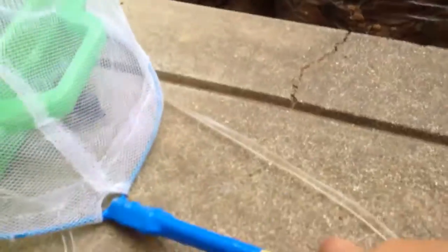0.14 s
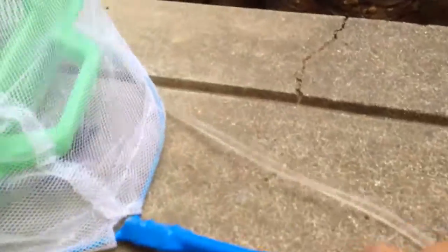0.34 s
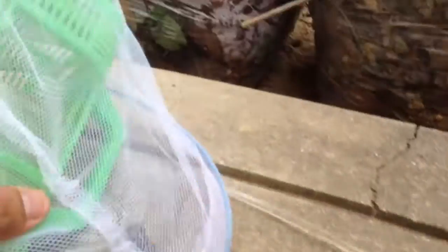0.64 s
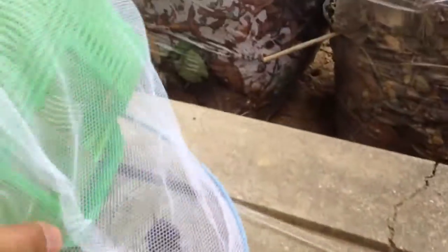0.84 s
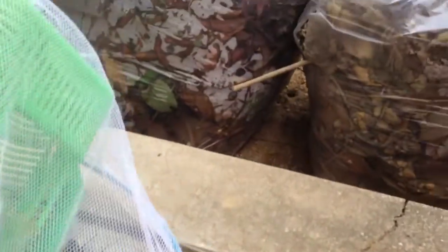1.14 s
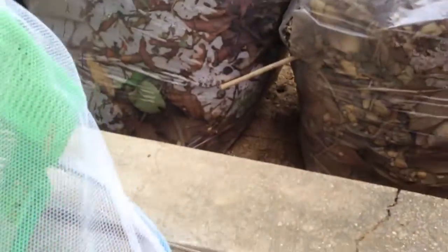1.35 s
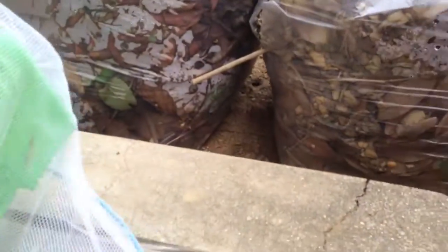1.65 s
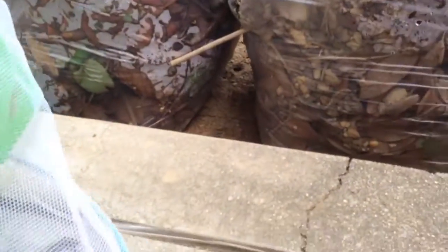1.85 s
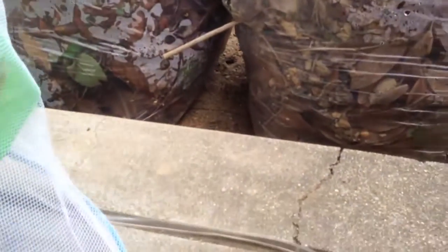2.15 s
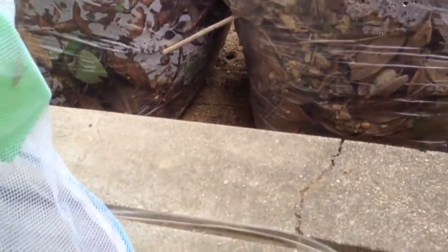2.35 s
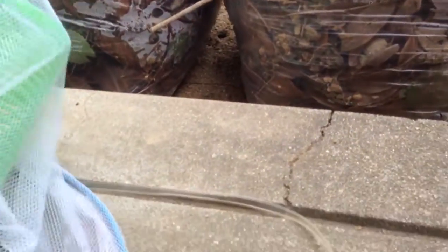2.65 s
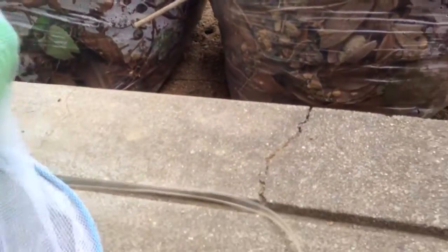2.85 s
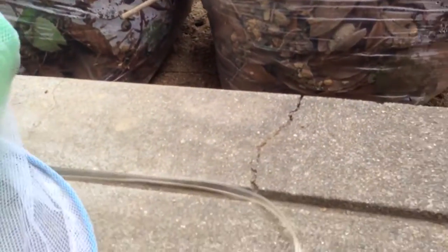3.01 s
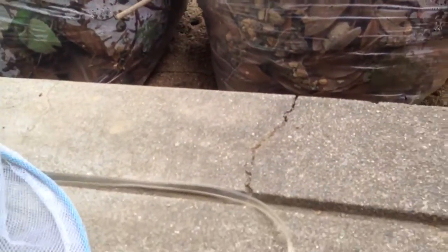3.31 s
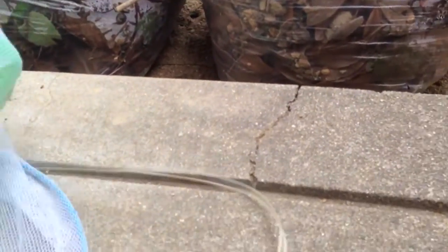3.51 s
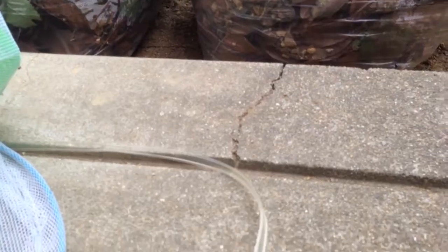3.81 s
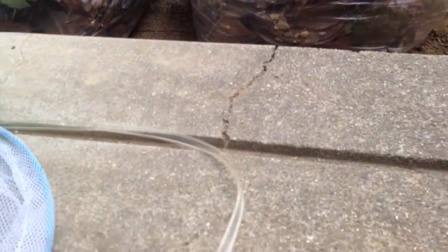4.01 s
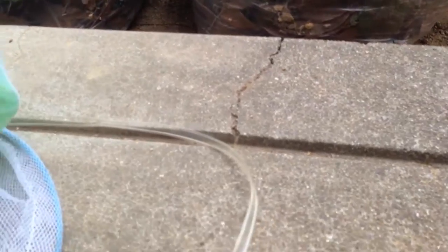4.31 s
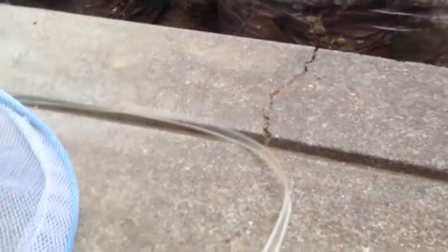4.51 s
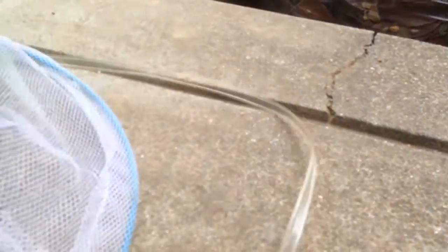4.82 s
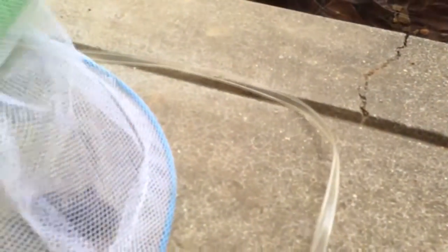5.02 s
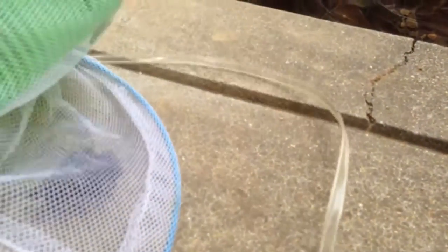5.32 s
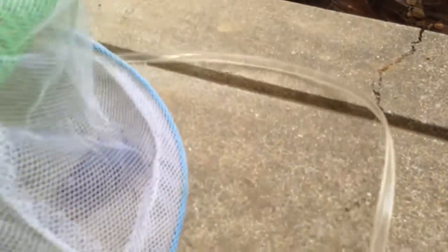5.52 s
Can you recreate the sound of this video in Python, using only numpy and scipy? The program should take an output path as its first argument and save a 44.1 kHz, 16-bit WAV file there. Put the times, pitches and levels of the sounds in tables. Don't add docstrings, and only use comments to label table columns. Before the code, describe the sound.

Rapid, irregular papery flutters and sharp snaps of insect wings against mesh and a plastic cage, with a near-quiet gap before a renewed burst.

```python
import sys
import numpy as np
from scipy import signal
from scipy.io import wavfile
from scipy.ndimage import uniform_filter1d

SR = 44100
rng = np.random.default_rng(int(sys.argv[2]) if len(sys.argv) > 2 else 0)


def volts_from_decibels(level):
    exponent = np.asarray(level, float) / 20
    return 10 ** exponent


def persist_wave(psi):
    counts = np.round(np.clip(psi, -1, 1) * 32767).astype(np.int16)
    wavfile.write(sys.argv[1], SR, np.atleast_2d(counts).T)


N = 249606
SLAP_DELAY_S = 0.00099
TAIL_BEND, SWEEP_BEND = 1.074, 1.01


def rms_one(x):
    return x / np.sqrt(np.mean(x ** 2) + 1e-20)


def at_hz(points, hz):
    point_hz, point_db = np.transpose(points)
    return np.interp(np.log(hz), np.log(point_hz), point_db)


def drift(rate_hz):
    pole = np.exp(-32 * np.pi * rate_hz / SR)
    noise = rng.standard_normal(N // 16 + 2002)
    slow = signal.lfilter([1], [1, -2 * pole, pole * pole], noise)[2000:]
    return np.interp(np.arange(N) / 16, np.arange(len(slow)), rms_one(slow))


def ring(clicks, hz, t60):
    radius, angle = volts_from_decibels(-60 / (t60 * SR)), 2 * np.pi * hz / SR
    return signal.lfilter([0, np.sin(angle)], [1, -2 * radius * np.cos(angle), radius * radius], clicks + 1e-18)


def high_pass(x, hz):
    return signal.sosfilt(signal.butter(2, hz, "high", fs=SR, output="sos"), x)


def bands(low_hz, count, size=2):
    edges = low_hz * 2 ** (np.arange(count + 1) / size)
    return [(np.sqrt(a * b), signal.butter(2, [a, b], "band", fs=SR, output="sos"))
            for a, b in zip(edges, edges[1:])]


def contacts():
    # (time [s], power [dB], fall [ms], brightness [dB])
    mesh_slaps = [(0.3496, -20, 0.85, 14), (0.5943, -44, 1.0, 8), (0.7005, -15.5, 1.8, 5.5),
                  (0.879, -20, 5.7, 14), (0.9412, -15, 3.6, 10), (0.9809, -19.5, 5.1, 11),
                  (1.067, -31, 3.4, 26), (1.2216, -13, 1.8, 5), (1.252, -23, 2.4, 3),
                  (1.2906, -8, 0.71, 8.5), (1.4432, -17.5, 2.6, 9), (1.522, -19.5, 4.2, 17),
                  (2.3263, -25.5, 6.4, -4), (2.4046, -19, 3.1, 4), (2.505, -21, 0.73, 10),
                  (2.6795, -17, 3.6, 12.5), (2.831, -11.5, 1.1, 11), (2.8845, -29, 6.5, -5),
                  (3.0304, -24, 5.7, 9), (3.3046, -15.5, 1.3, 9), (3.3791, -23.5, 4.3, -3),
                  (3.4115, -20.5, 9.4, 2), (3.6055, -12.5, 2.5, 4), (3.612, -16, 0.84, 4),
                  (3.6385, -14.5, 1.2, 4), (3.654, -31, 9.5, 4), (3.667, -26.5, 0.76, 4),
                  (3.689, -47, 0.8, 2), (4.7973, -14, 0.52, 13), (4.9021, -18, 1.1, 4),
                  (5.014, -18, 2.2, 16), (5.0325, -20, 2.3, 4), (5.091, -41, 4.5, 17),
                  (5.0998, -19.5, 2, 9), (5.1852, -15.5, 0.89, 2), (5.212, -31, 1.4, 12),
                  (5.294, -25, 1.9, 7), (4.6042, -20, 3.3, 5), (4.921, -24, 0.34, 31),
                  (4.9755, -17, 2.4, 17.5), (5.1073, -26, 5, 9), (5.359, -34, 3.5, 25),
                  (5.406, -15, 1.6, 16)]
    # (time [s], power [dB], fall [ms], brightness [dB])
    draped_slaps = [(0.0249, -16, 5, 0), (0.0521, -14.5, 1.8, -9), (0.058, -26.5, 22, 4),
                    (0.5595, -34.5, 1.9, 21), (1.0737, -17, 3.7, 4), (1.4158, -17.5, 4.3, 7),
                    (1.5546, -26.5, 17, 5), (1.6003, -15.5, 1.3, 13), (1.941, -14.5, 1.1, 6),
                    (2.1838, -25, 1, -6), (2.1982, -7, 0.92, 7.5), (2.2485, -21.5, 3.1, 1),
                    (2.2594, -19.5, 3.2, 9), (2.2945, -33, 2.5, 4), (2.3076, -19.5, 2.7, 3),
                    (2.3778, -16, 7.3, 6.5), (2.5983, -8.5, 2, -2), (2.7045, -9, 1.4, 1),
                    (2.9998, -20, 1.5, 15), (3.129, -34, 4.6, 3), (3.172, -14, 3.1, 3.5),
                    (3.2662, -15, 2.3, 7), (3.3094, -17, 2.7, 3), (3.6006, -17, 3.6, 4),
                    (4.6702, -15, 2.6, 5), (5.0378, -9.5, 1, 10), (5.0727, -16, 0.95, 14),
                    (5.1857, -20.5, 3.4, 6), (5.3012, -24, 5.4, 2)]
    # (time [s], power [dB], fall [ms], brightness [dB])
    cage_slaps = [(0.0879, -31, 19, -8), (0.1047, -14.5, 4.8, 5.5), (0.3325, -22, 10.8, -1),
                  (0.639, -6, 1.3, -11.5), (0.6827, -33.5, 28, -1), (0.7068, -22, 6.8, 6),
                  (0.7447, -25, 7.2, 5), (0.8325, -20, 6.7, -1), (0.846, -14, 1.6, 16),
                  (0.9086, -24.5, 6, 17), (2.0872, -17.5, 0.9, -3), (2.544, -32, 49, -8),
                  (2.729, -28.5, 14, -12), (2.871, -18.5, 2.9, -0.5), (2.9764, -22.5, 3.6, 2.5),
                  (3.0926, -27, 8.3, 6), (3.148, -19, 2.6, -3), (3.452, -32, 0.67, -7),
                  (4.7983, -19.5, 6.7, -6), (4.8737, -12.5, 3.9, 0.5), (4.95, -31, 290, 6.5),
                  (5.0055, -10.5, 1.6, 9), (5.2622, -16.5, 2.3, 5), (5.2765, -17, 0.49, -35),
                  (5.4986, -29.5, 6.2, 13)]
    # (time [s], power [dB], fall [ms], brightness [dB])
    plucks = [(0.0394, -25, 1.8, 18), (0.0533, -13.5, 1.24, 12), (0.0606, -21, 1.2, 18),
              (0.159, -20, 1.4, 3), (0.2494, -35, 7.9, 12), (0.2783, -33, 0.51, 21), (0.3236, -31, 0.5, 17),
              (0.3416, -21.5, 0.44, 19), (0.8168, -23.5, 1.9, 19), (0.8652, -27, 3, 12),
              (0.9578, -15.5, 1.1, 16), (0.9809, -22, 1.7, 6), (1.0049, -32, 2.2, 20),
              (1.0553, -31, 0.8, 20), (1.2729, -34, 4.5, 17), (1.2808, -21, 1.4, 6), (1.3595, -27, 2.6, 12),
              (1.3979, -29, 0.92, 7), (1.4518, -14.5, 1, 12), (1.4828, -15.5, 3, 14),
              (1.5307, -18, 0.63, 20), (1.5601, -20, 0.6, 5), (1.5806, -30, 1.6, 15),
              (1.5982, -14.5, 0.94, 5), (1.6063, -18, 1.1, 10), (1.6791, -25, 0.45, 23),
              (1.8315, -27, 2.5, 5), (1.8519, -36, 1.6, 20), (1.9927, -32, 1.9, -1),
              (2.0405, -30, 0.88, 23), (2.0352, -25, 1.7, 10), (2.1636, -37, 0.77, 15),
              (2.2152, -27.5, 5.5, 6), (2.3553, -25, 0.7, 7), (2.4046, -11.5, 0.48, 12),
              (2.4524, -40, 2.5, 14), (2.8215, -44, 4.5, 3), (3.0705, -20.5, 0.64, 13),
              (3.0941, -26, 1.2, 2), (3.2077, -27.4, 0.8, 8), (3.2473, -23, 4.3, 5), (3.2598, -15, 1.5, 2),
              (3.3788, -14.5, 1.7, 13), (3.4513, -18, 1.1, -7), (3.5472, -33, 3.4, 4),
              (3.5775, -44, 0.5, 13)]
    # (time [s], power [dB], fall [ms], brightness [dB])
    ticks = [(0.1661, -21, 4.8, 0), (0.4662, -33, 2, -9), (0.4815, -38, 0.6, -10), (0.5344, -35, 0.5, 0),
             (0.6828, -19, 0.59, -10), (1.2313, -20, 0.84, 3), (1.6967, -12.5, 0.43, 0),
             (1.8983, -27.5, 4.5, 9), (2.0895, -15, 0.73, 0), (2.1832, -18.5, 1.3, 1),
             (2.5358, -23, 1.2, 5), (2.5469, -18.5, 2.8, -11), (2.5755, -20, 4.9, 3), (2.5854, -23, 4.9, 3),
             (2.6459, -19.5, 2.1, 6), (2.7289, -24, 1, -6), (2.8543, -34, 1.1, -4), (2.9007, -28, 1.2, 2),
             (2.9299, -45, 2.2, -1), (3.1302, -14.5, 3.7, 4.5), (3.4284, -15, 0.63, 4),
             (3.5248, -22.5, 3.8, 2), (4.0049, -30, 2.9, -6), (4.0203, -40, 1.6, -13),
             (4.2277, -47.4, 4.5, -2), (4.6868, -22, 0.52, -29), (5.158, -25.5, 4.4, -5),
             (5.4507, -26, 0.77, -5)]
    # (time [s], power [dB], length [ms], brightness [dB])
    brushes = [(0.535, -30, 5.7, 3), (1.007, -26, 9.9, 12), (1.142, -17.5, 3.9, 10), (1.39, -15, 4.7, -3.5),
               (1.498, -20.5, 10, -1), (1.627, -18.5, 3.5, 4.5), (1.823, -19, 11.8, 3.5),
               (2.062, -35, 3.2, 25), (2.35, -26, 21, 5), (2.79, -22.5, 3.8, 6), (4.599, -17, 1.8, -4),
               (4.76, -18, 5.2, 0.5), (4.814, -17.5, 8.5, 5.5), (5.124, -22, 10.4, 6)]
    # (time [s], power [dB], length [ms], brightness [dB])
    snags = [(0.04, -28.5, 16, -4), (0.143, -24, 4.6, 3), (0.198, -27, 6.8, 7), (0.279, -40.5, 18, 2),
             (0.925, -21, 7.9, 7), (1.123, -15.5, 9.7, 8), (1.182, -19, 5.3, 10), (1.716, -23.5, 9.4, 13.5),
             (1.903, -31.5, 8.2, -10), (1.997, -25, 6.6, 6), (2.0272, -16.5, 1.9, 18),
             (2.04, -30.5, 9.8, -6), (3.024, -30, 5.1, 13), (3.22, -16.5, 4.5, 6), (3.481, -17, 6.6, 8),
             (3.99, -39.5, 27, -7), (4.138, -45.5, 26, -8), (4.167, -34, 4, 0), (4.238, -42, 2.2, -7),
             (4.284, -45.5, 69, -6), (4.714, -9, 5.1, -4), (5.162, -30, 5.4, 16), (5.227, -22.5, 3.8, 12),
             (5.258, -23, 9.7, -16), (5.3285, -15, 3.7, 16)]
    # (time [s], power [dB], length [ms], brightness [dB])
    drags = [(0.173, -21.5, 7.7, -1), (0.493, -38, 19, -5), (0.782, -23, 12.5, 5), (0.819, -24.5, 14, -10),
             (0.991, -15, 4.4, 4), (1.329, -31.5, 25, -21), (1.373, -22, 6.2, 8),
             (1.703, -21.5, 8.6, -14.5), (1.74, -21, 6.7, 10.5), (1.78, -15.5, 4.7, 10),
             (1.882, -9, 3.4, 4.5), (1.955, -32, 12, 3), (2.114, -17, 5.8, 7), (2.463, -28, 3.4, 11),
             (2.647, -28, 2.5, -14), (2.719, -22, 18, 2), (2.753, -16.5, 2.7, 10), (3.371, -20, 4.2, -5),
             (3.519, -30, 18.5, 5), (3.633, -24.5, 6.4, -4), (4.463, -53.5, 94, -14), (4.635, -18, 8.8, 3),
             (4.904, -24, 13.6, 3), (5.377, -25.5, 4.6, 0), (5.397, -25.5, 11, 0),
             (5.436, -30.5, 17.5, 7.5), (5.484, -22, 2.6, -6)]
    mesh_db, draped_db, cage_db, snag_db, drag_db = -31, -21, -16, -17.5, -19.5
    slap_rise_ms, pick_rise = 0.35, 0.17

    rows = []
    for table, place_db in [(mesh_slaps, mesh_db), (draped_slaps, draped_db), (cage_slaps, cage_db)]:
        for s, db, ms, bright in table:
            rows.append((s + SLAP_DELAY_S, db, slap_rise_ms, ms, bright, place_db, TAIL_BEND))
    for table, place_db in [(plucks, mesh_db), (ticks, drag_db)]:
        for s, db, ms, bright in table:
            rows.append((s, db, pick_rise * ms, ms, bright, place_db, TAIL_BEND))
    for table, rise, place_db in [(brushes, 0.31, mesh_db), (snags, 0.65, snag_db), (drags, 0.36, drag_db)]:
        for s, db, ms, bright in table:
            rows.append((s, db, rise * ms, (1 - rise) * ms, bright, place_db, SWEEP_BEND))
    return [(s, db, rise, fall, bright, place_db - 0.063 * (db + 43.0) - 0.37 * bright, bend)
            for s, db, rise, fall, bright, place_db, bend in rows]


def effort():
    # (time [s], power [dB], brightness [dB])
    rustle = [(0.0, -45, 5), (0.44, -48, -9), (1.5, -42, -3.5), (2.2, -51, -8), (3.41, -44, -6),
              (3.74, -57.5, -3), (3.85, -67, 7), (4.07, -53, -5.5), (4.25, -63, -9), (4.45, -50, 2),
              (4.84, -59, -30), (5.39, -58, -7), (5.5, -41.5, -7), (5.66, -48, -10)]
    # (time [s], power [dB], swell and fade [ms], brightness [dB])
    bag_rubs = [(0.22, -37.5, 21, 1), (0.66, -33, 37, -3.5), (0.88, -24, 19.6, 2.5),
                (1.32, -32.5, 12.4, 14), (1.87, -38, 15, 20), (2.53, -30.5, 55, 2), (2.64, -27, 49, 2),
                (2.84, -30.5, 8.1, -7), (3.299, -31, 59, 1), (3.958, -40, 6.6, -13), (4.73, -37.5, 14, -6),
                (5.06, -43, 140, -2.5), (5.28, -31.5, 24, -5)]
    rub_plastic_db = -21.5

    t = np.arange(N) / SR
    s, rustle_db, bright_db = np.transpose(rustle)
    rustle_db, bright_db = np.interp(t, s, rustle_db), np.interp(t, s, bright_db)
    tilt_db = np.array([np.full(N, -3.5), -bright_db / 2, bright_db / 2])
    power = volts_from_decibels(rustle_db + tilt_db) ** 2

    rubs = [(s, db, ms, ms, bright, rub_plastic_db, TAIL_BEND) for s, db, ms, bright in bag_rubs]
    for s, db, rise, fall, bright, plastic_db, bend in contacts() + rubs:
        near = slice(max(round((s - 0.3) * SR), 0), round((s + 0.3) * SR))
        ms = (t[near] - s) * 1000
        scale_ms = np.where(ms < 0, max(rise, 0.1), max(fall, 0.2))
        swell = np.exp(-(np.abs(ms) / scale_ms) ** bend)
        part_db = np.array([[plastic_db + 15], [-bright / 2 + 0.5], [bright / 2 - 1.5]])
        power[:, near] += volts_from_decibels(db + part_db) ** 2 * swell
    return 10 * np.log10(power)


def shaking():
    # (time [s], rumble level [dB])
    jolts = [(0.0, -63.5), (0.22, -59), (0.35, -69), (0.66, -56.5), (0.88, -54.5), (1.32, -61), (1.43, -57),
             (2.29, -54.5), (2.64, -63), (3.19, -62.5), (4.29, -53.5), (4.62, -59.5), (4.96, -60),
             (5.15, -61), (5.277, -64), (5.58, -64)]
    rise_db_per_s, fade_db_per_s, still_db = 168, 113, -68
    t = np.arange(N) / SR
    power = volts_from_decibels(still_db) ** 2
    for s, db in jolts:
        slope = np.where(t < s, rise_db_per_s, fade_db_per_s)
        power = power + volts_from_decibels(db - slope * np.abs(t - s)) ** 2
    return 10 * np.log10(power)


def air(effort_db):
    # (frequency [Hz], level [dB per Hz])
    hush = [(30, -45), (65, -10.5), (120, -13.5), (190, -6), (450, -11.5), (1000, -14), (14800, -31.5)]
    fan_follows = 0.45
    white, out = rng.standard_normal((2, N)), 0
    lumps_db = 3 * drift(28)
    fan_db = fan_follows * (uniform_filter1d(effort_db, size=500) + 40)
    shake_db = shaking() + 74 + fan_db
    for k, (hz, sos) in enumerate(bands(28.7, count=18)):
        low_share = np.clip(1.3 - hz / 400, 0, 1)
        puff_db = (shake_db + lumps_db + 4.7 * drift(21.3)) * low_share
        out = out + volts_from_decibels(at_hz(hush, hz) + puff_db) * signal.sosfilt(sos, white[k % 2])
    return volts_from_decibels(-42.5) * out


def scratches():
    # (time [s], length [s], mode [Hz],
    # level [dB])
    scrapes = [(0.36, 0.052, 2700, -58), (0.37, 0.14, 2030, -61), (0.68, 0.021, 720, -54),
               (1.325, 0.031, 486, -53.5), (2.715, 0.026, 577, -48), (3.5, 0.05, 4200, -59),
               (3.951, 0.047, 810, -53.5), (3.958, 0.057, 5640, -57), (3.996, 0.013, 1870, -47),
               (4.125, 0.018, 5700, -53.5), (4.127, 0.011, 1000, -55.5), (4.128, 0.018, 1720, -46),
               (4.129, 0.017, 4360, -57), (4.162, 0.007, 8300, -58), (4.263, 0.027, 1690, -57.5),
               (4.272, 0.03, 4140, -64), (4.276, 0.023, 5800, -58), (3.9, 0.0085, 940, -75),
               (4.421, 0.083, 5650, -62), (4.439, 0.065, 1740, -60.5), (4.483, 0.028, 810, -60.5),
               (5.394, 0.11, 690, -60), (5.484, 0.063, 3760, -49.5), (5.492, 0.07, 880, -57),
               (5.495, 0.06, 1900, -56.5), (5.59, 0.037, 3630, -59), (5.644, 0.016, 2680, -60)]
    out = np.zeros(N + SR)
    for s, length, hz, db in scrapes:
        start, size = round(s * SR), round(length * SR)
        envelope = np.hanning(size + 2)[1:-1] ** 0.12
        rub = np.pad(rng.laplace(size=9000)[:size] * envelope, (0, 2000))
        ringing = ring(rub, hz, t60=0.005 + 19 / hz)
        out[start:start + size + 2000] += volts_from_decibels(db) * ringing / np.std(ringing[:size])
    return out[:N]


def thumps():
    # (time [s], peak level [dB], mode [Hz])
    body_hits = [(0.105, -42, 200), (0.636, -27.5, 189.5), (0.696, -36, 183), (0.738, -40, 146),
                 (0.889, -57, 96), (1.073, -42.5, 205), (1.113, -43, 257), (1.305, -46, 254),
                 (1.332, -40, 207), (1.373, -42, 147), (1.409, -43, 102), (1.494, -36.5, 191),
                 (2.544, -37, 189), (2.577, -38.5, 154), (3.208, -45, 188), (3.365, -42.5, 166),
                 (4.218, -46.5, 187), (4.711, -40, 206), (4.954, -40.5, 89), (4.989, -36, 171),
                 (5.652, -31, 296)]
    overtone, overtone_db = 2.32, -13.5
    out = 0
    for s, db, hz in body_hits:
        push = np.zeros(N)
        push[round(s * SR)] = volts_from_decibels(db + 2.0)
        out = out + ring(push, hz, t60=0.079)
        out = out + volts_from_decibels(overtone_db) * ring(push, overtone * hz, t60=0.15)
    soft = np.exp(-2 * np.pi * 350 / SR)
    softened = signal.lfilter([(1 - soft) ** 2], [1, -2 * soft, soft ** 2], out)
    return high_pass(softened, 90)


def bars():
    # (time [s], mode [Hz], level [dB])
    bar_blows = [(0.051, 6200, -18), (0.106, 4900, -15.5), (0.3498, 4760, -24), (0.534, 3870, -29.5),
                 (0.5345, 6800, -25.5), (1.2216, 4200, -21), (1.598, 5300, -16), (1.702, 3530, -18.5),
                 (1.882, 4600, -15), (2.1987, 4620, -14), (2.5997, 2380, -17), (2.7038, 2430, -11),
                 (2.7043, 6460, -23), (2.7524, 2530, -16), (2.8318, 2660, -17), (2.8318, 4590, -13),
                 (2.8323, 5920, -19.5), (3.131, 4430, -14.5), (3.1306, 1900, -19.5), (3.525, 4600, -20.5),
                 (3.6024, 5700, -12), (4.021, 1680, -27.5), (4.0196, 4000, -36), (4.874, 5440, -17.5),
                 (5.0064, 4500, -16.5), (5.0388, 11200, -14), (5.263, 3790, -20), (5.275, 1490, -21.5),
                 (5.484, 3800, -26)]
    out = 0
    for s, hz, db in bar_blows:
        blow = np.zeros(N)
        blow[round(s * SR)] = volts_from_decibels(db)
        out = out + ring(blow, hz, t60=0.0053 + 10.4 / hz)
    return high_pass(out, 1100)


def cracks():
    # (time [s], peak level [dB])
    rim_snaps = [(0.1047, -2), (0.638, -1), (1.1216, -4), (1.2226, -12.5), (1.2911, -11), (1.7014, -19),
                 (1.7806, -5.5), (1.882, -1.5), (2.1976, -1), (2.377, -22), (2.5987, -5), (2.704, -1.5),
                 (2.998, -13.5), (3.4767, -16), (3.6001, -9), (4.633, -11.5), (4.7071, 2.5), (4.7142, -7),
                 (4.9765, -12), (5.0057, 1.5), (5.0376, -0.5), (5.0715, -12), (5.2618, -1), (5.328, -11)]
    s, db = np.transpose(rim_snaps)
    blows = np.zeros(N)
    blows[np.round((s + SLAP_DELAY_S) * SR).astype(int)] = volts_from_decibels(db - 1.5)
    blows = blows - 0.54 * np.roll(blows, 11)
    return signal.sosfilt(signal.butter(1, [800, 13000], "band", fs=SR, output="sos"), blows)


def crackle(per_s, spread_db, hiss, clump_db, crack):
    size_db = spread_db * np.minimum(rng.exponential(1, N), 4)
    snaps = (rng.random(N) < per_s / SR) * rng.choice([-1, 1], N) * volts_from_decibels(size_db)
    friction = rms_one(snaps) + hiss * rng.standard_normal(N)
    grains = rms_one(friction * volts_from_decibels(clump_db * drift(230)))
    grains = grains / (uniform_filter1d(grains ** 2, size=90) + 0.11) ** 0.23
    for s, db, *_ in contacts():
        at = round(s * SR)
        size = crack * np.clip((db + 18.5) / 16, 0, 1) * np.sign(grains[at])
        grains[at - 1:at + 2] = size * np.array([0.65, 1, 0.65])
    return grains


def wings(low_db, mid_db, high_db):
    # (frequency [Hz], level [dB per Hz])
    wing_colour = [(330, -17), (700, -9.5), (1300, -12.5), (2400, -9.5), (4300, -6.5), (13400, -7.5),
                   (15500, -15.5)]
    grains = crackle(per_s=5800, spread_db=3.5, hiss=0.89, clump_db=3.5, crack=2.76)
    top_band = (15000, signal.butter(2, 14500, "high", fs=SR, output="sos"))
    out = 0
    for k, (hz, sos) in enumerate(bands(319.3, count=22, size=4) + [top_band]):
        share = np.array([np.interp(np.log(hz), np.log([900, 2400, 9000]), part) for part in np.eye(3)])
        db = share @ [low_db, mid_db, high_db] + at_hz(wing_colour, hz) + 3.52 * drift(49.4)
        out = out + (-1) ** k * signal.sosfilt(sos, grains * volts_from_decibels(db))
    return volts_from_decibels(0.09) * out


def scene():
    low_db, mid_db, high_db = effort()
    background = air(low_db)
    cage = scratches() + thumps() + bars() + cracks()
    return (background + cage + wings(low_db, mid_db, high_db))[None]


def band_limit(x):
    return signal.sosfilt(signal.butter(12, 16490, fs=SR, output="sos"), x)


def record(dry):
    cutoff_hz = 15340
    rounded = 1.2 * np.tanh(dry / 1.2)
    cut = signal.sosfilt(signal.cheby2(18, 18, cutoff_hz, fs=SR, output="sos"), rounded)
    cut = signal.sosfilt(signal.cheby2(10, 30, cutoff_hz + 700, fs=SR, output="sos"), cut)
    return band_limit(cut)


dry = scene()
out = record(dry)
persist_wave(out)
```